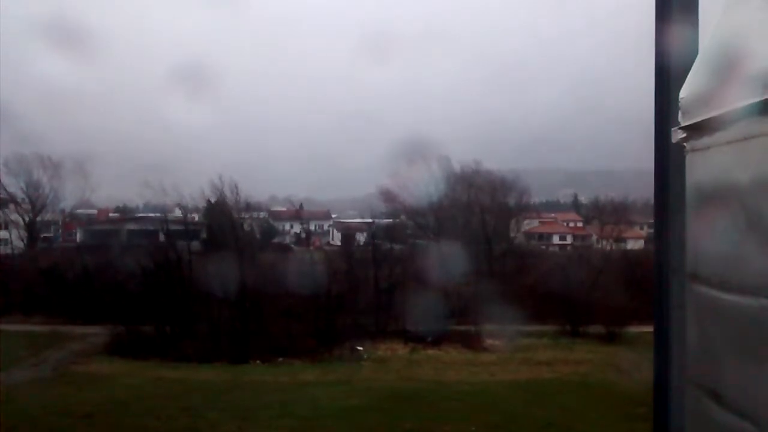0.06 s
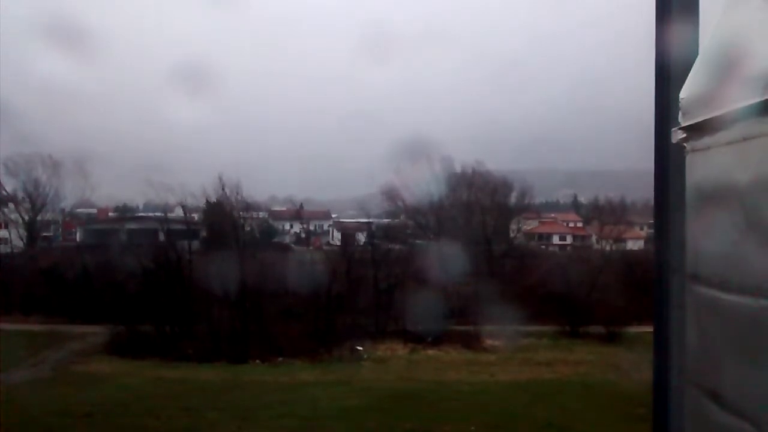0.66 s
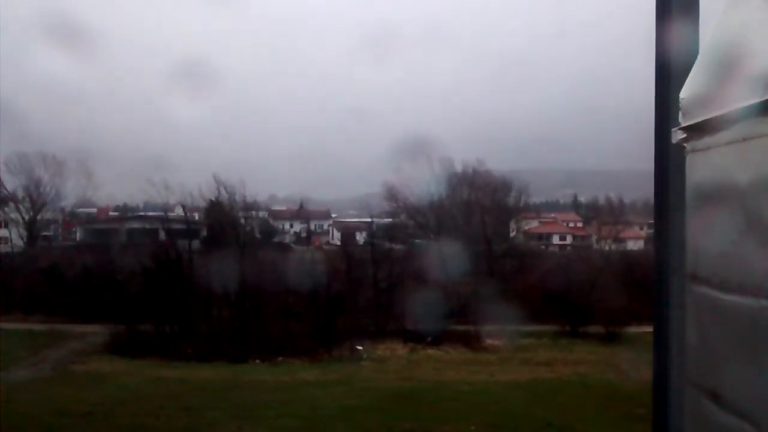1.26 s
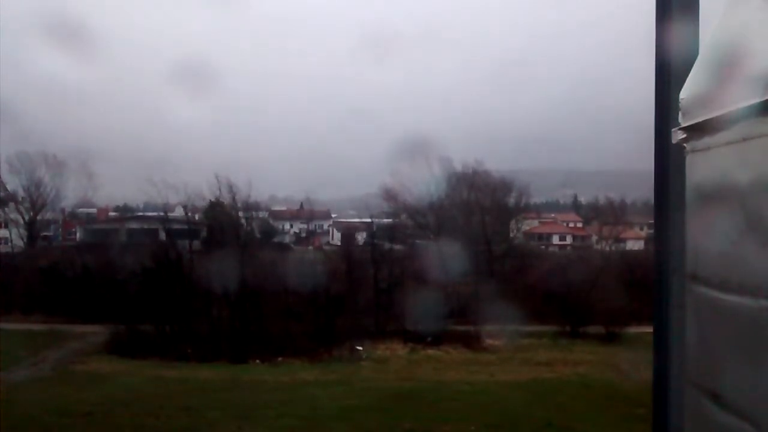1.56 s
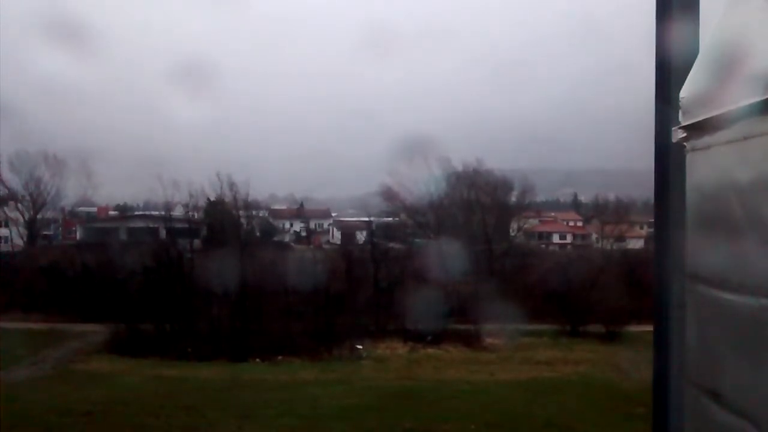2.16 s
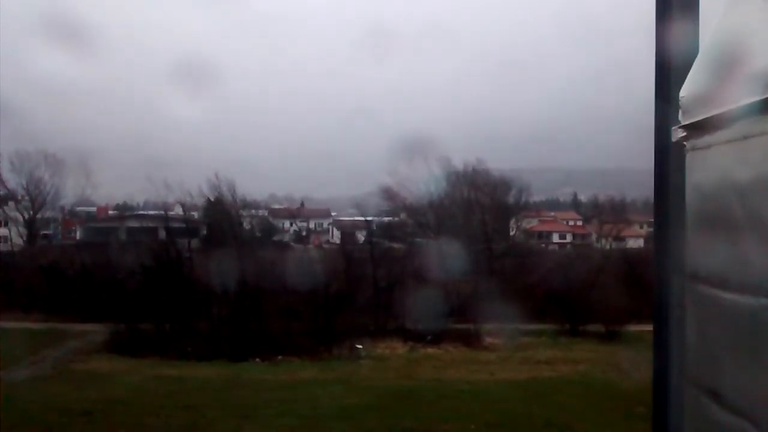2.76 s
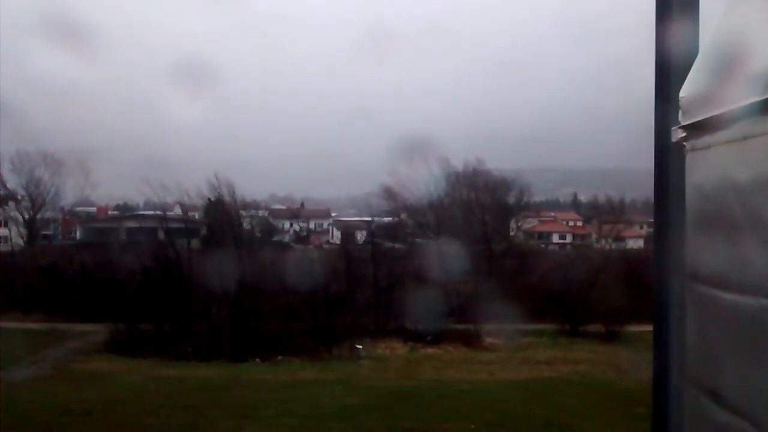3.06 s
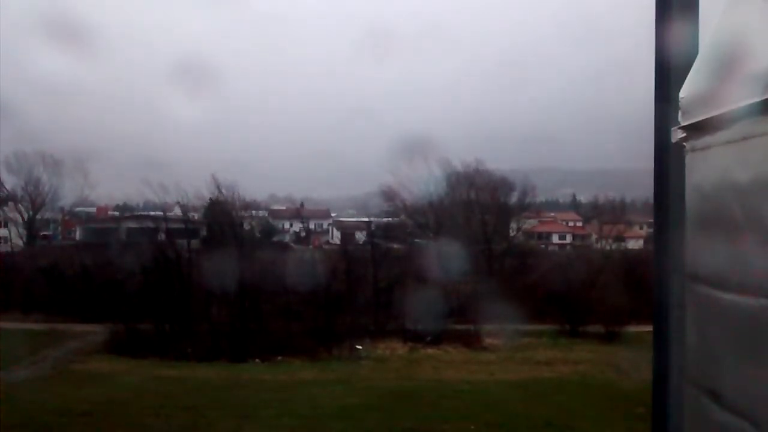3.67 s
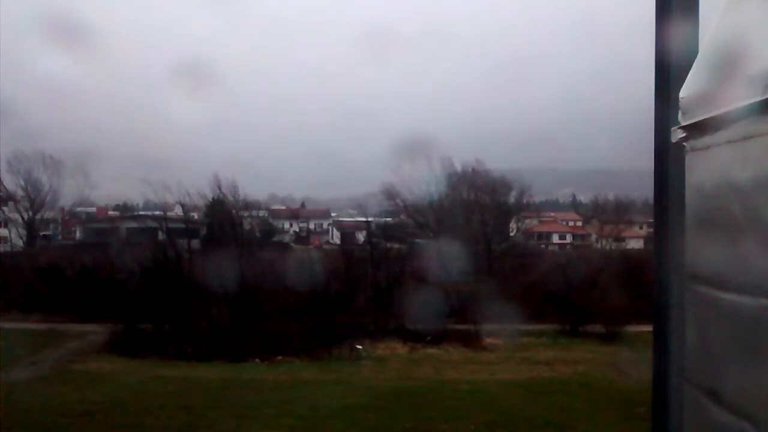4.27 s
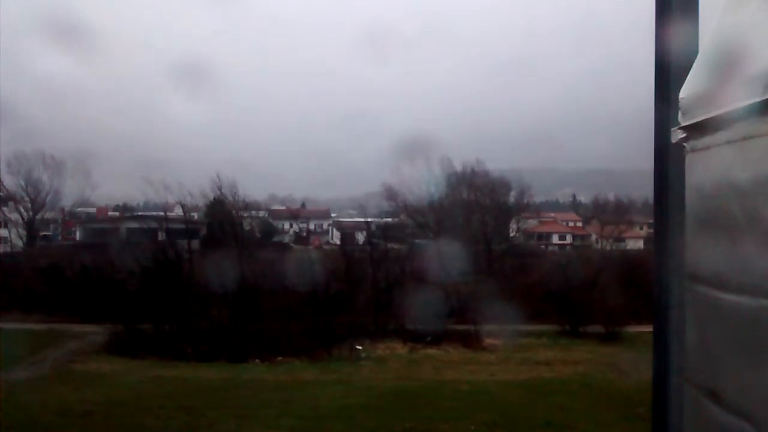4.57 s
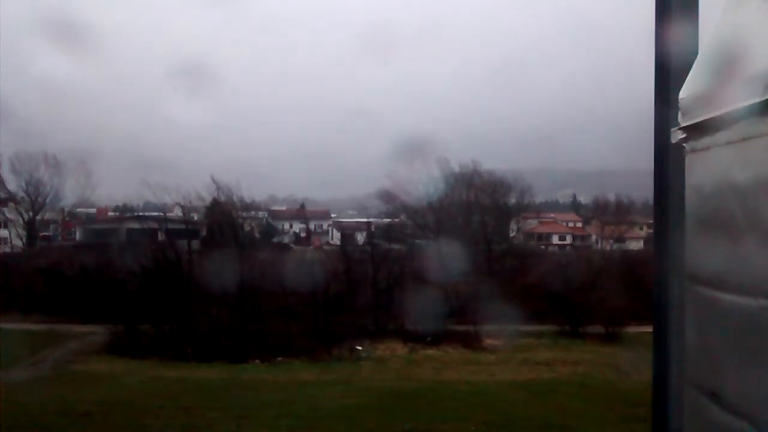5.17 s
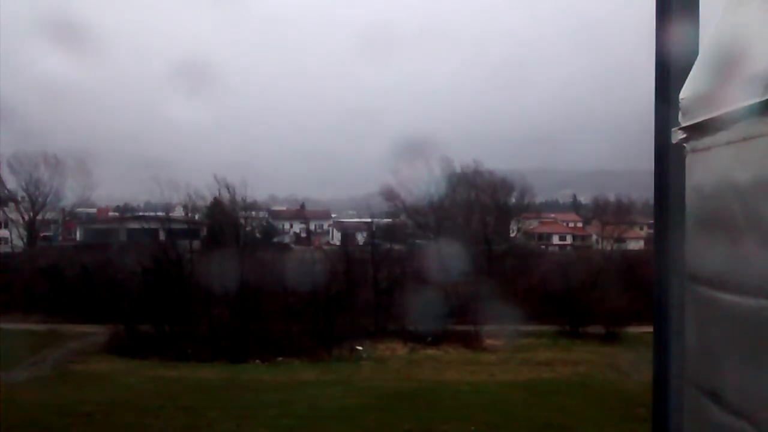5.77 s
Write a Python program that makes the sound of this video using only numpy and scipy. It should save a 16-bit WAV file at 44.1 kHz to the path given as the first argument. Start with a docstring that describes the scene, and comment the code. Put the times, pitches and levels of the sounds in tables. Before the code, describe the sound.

Steady, low storm wind hums and rumbles at a closed window, heard from indoors, with fine rain and a few drops ticking.

```python
"""Storm at a window, from indoors.

Gusts shake the pane, drone in the window recess, hum past the closed window, roar round the walls
and rush through the trees. One squall throws fine rain on the glass; a few heavier drops tick on
the sill. Two spaced microphones pick it up over their own faint hiss."""
import sys
import numpy as np
from scipy import signal
from scipy.fft import rfft, irfft, next_fast_len
from scipy.io import wavfile
from scipy.ndimage import uniform_filter1d, map_coordinates

SR = 44100
rng = np.random.default_rng(int(sys.argv[2]) if len(sys.argv) > 2 else 0)


def inscribe(sig):
    """Save sig as 16-bit PCM at rate SR to the path in sys.argv[1].

    A 1-D sig is mono; a 2-D sig holds one channel per row.
    Samples are clipped to [-1, 1] before scaling.
    """
    pcm = np.round(np.clip(np.atleast_2d(sig).T, -1, 1) * 32767)
    wavfile.write(sys.argv[1], SR, pcm.astype(np.int16))


N = 256662

# wind strength; roar, rush, rumble, drone, base hum and drizzle each follow their own share:
# t/s, level about the mean/dB
WIND_STRENGTH = [(0, 3), (0.2, 5), (0.55, 5), (1.2, 3), (1.55, 2), (1.92, 2), (2.2, -0.9), (2.45, -2.5),
                 (3.0, -6), (3.42, -4.5), (3.6, -3.5), (4.15, -3.5), (4.7, -1.5), (5.03, -2), (5.35, -0.5),
                 (5.82, 1.5)]


def amp(db):
    """Decibels to gain."""
    return 10 ** (np.asarray(db) / 20)


def unit(x):
    """Scale to rms 1."""
    return x / np.sqrt(np.mean(x ** 2) + 1e-20)


def along(points, hz):
    """Interpolate (f/Hz, value) points on a log axis."""
    f, values = np.transpose(points)
    return np.interp(np.log(hz + 1), np.log(f + 1), values)


def curve(points):
    """Interpolate (t/s, value) points per sample."""
    return np.interp(np.arange(N) / SR, *np.transpose(points))


def swell(peak_s, length_s):
    """Bell of height 1, above half for length_s."""
    return np.exp2(-(2 * (np.arange(N) / SR - peak_s) / length_s) ** 2)


def wobble(rate_hz):
    """Smooth random curve, rate_hz knots a second."""
    knots = rng.standard_normal(int(N * rate_hz / SR) + 4)
    return map_coordinates(knots, [np.arange(N) * rate_hz / SR])


def filtered(x, response):
    """Apply a frequency response."""
    size = next_fast_len(N + SR // 2)
    return irfft(rfft(x, size) * response(np.fft.rfftfreq(size, 1 / SR)), size)[..., :N]


def resonance(hz, centre_hz, width_hz):
    """Gain of one mode, 1 at its centre."""
    return hz * width_hz / np.hypot(centre_hz ** 2 - hz ** 2, hz * width_hz)


def steadied(x, span_s):
    """Even out a noise's own swells: divide by its running rms."""
    power = uniform_filter1d(np.mean(x ** 2, axis=0), max(int(span_s * SR), 1))
    return x / np.sqrt(np.abs(power) + 1e-9)


def noise_pair():
    """Two independent white noises."""
    return rng.standard_normal((2, N))


def microphones(pair, gain, coherence=None, balance=None):
    """Spaced pair: two independent signals become coloured, partly coherent stereo of rms 1."""
    # phase lead of left over right: f/Hz, phase/rad
    lead = [(0, 0), (340, 3.8), (690, 5.2), (1380, 6.3), (2410, 9.3), (2670, 9.5), (3530, 12.4),
            (3790, 12.7), (4740, 16.0), (5250, 16.8), (5940, 19.8), (6290, 19.8), (8790, 12.7),
            (15500, -3.5)]
    # likeness of the channels: f/Hz, coherence
    default_coherence = [(20, .5), (43, .68), (70, .15), (130, .45), (250, .45), (450, .62), (560, .55),
                         (750, .76), (1000, .91), (1300, .96), (2000, .8), (2400, .99), (2700, 1),
                         (3100, .85), (3700, 1), (6000, .7)]
    # left minus right: f/Hz, level/dB
    default_balance = [(25, 2.5), (43, 2.5), (70, -1), (110, 4.5), (250, 2.5), (390, 6), (700, 3),
                       (1300, 1.5), (2550, 0), (4400, -.3), (6000, 3), (12000, 1)]
    coherence = coherence or default_coherence
    balance = balance or default_balance
    angle = lambda hz: np.arccos(np.clip(along(coherence, hz), 0, 1)) / 2
    mid, side = filtered(pair, lambda hz: np.array([np.cos(angle(hz)), np.sin(angle(hz))]))
    half = np.array([[1], [-1]]) / 2
    pan = lambda hz: amp(half * along(balance, hz))
    phase = lambda hz: np.exp(1j * half * np.interp(hz, *np.transpose(lead)))
    return unit(filtered(np.array([mid + side, mid - side]), lambda hz: gain(hz) * pan(hz) * phase(hz)))


def through_frame(spectrum):
    """Response of an outdoor spectrum coloured by the window frame."""
    # frame resonances: f/Hz, width/Hz, lift/dB
    modes = [(377.5, 48, 10), (453.4, 67, 8), (573, 43, 6), (689, 91, 6.5), (931.5, 49, 7),
             (1100, 29, -9.5), (1200, 48, 2), (1317, 42, 5), (1788, 260, 8.5), (1947, 30, 6),
             (2778, 105, 12), (3090, 210, 4)]
    lift_db = lambda hz: sum(db * resonance(hz, f, width) ** 2 for f, width, db in modes)
    return lambda hz: amp(along(spectrum, hz) + lift_db(hz))


def blown(level_db, wind_share, flutter_db, flutter_hz):
    """Gain of a layer that follows the wind, with its own turbulence."""
    return amp(level_db + wind_share * curve(WIND_STRENGTH) + flutter_db * wobble(flutter_hz))


def gusts_db():
    """Extra push of single gusts on pane, recess, walls and trees, per sample."""
    # gusts striking the house: peak t/s, length/s, pane/dB, recess/dB, walls/dB, trees/dB
    gusts = [(0.308, 0.13, 1, 5, 0, -1), (0.566, 0.099, -4, 3.5, 0.5, 1), (0.965, 0.63, -0.5, 2.5, -1, 0),
             (2.152, 0.18, 5, 0.5, 3.5, 0), (2.37, 0.17, 0.5, 4.5, 0.5, 0), (2.598, 0.074, 8, 3.5, 2.5, 0),
             (3.594, 0.087, 2, -3, 3, 2.5), (3.96, 0.11, 2.5, 3.5, 2, 2.5),
             (4.302, 0.12, 4, 0.5, 0.5, -0.5), (4.73, 0.11, 1, 0.5, 1, 1), (5.267, 0.21, -2, 3, 0.5, 0.5),
             (5.77, 0.15, 6.5, 4.5, -1, -0.5)]
    return sum(np.outer(db, swell(peak_s, length_s)) for peak_s, length_s, *db in gusts)


def hiss(level_db=-60.5, waver_db=0.5):
    """Faint, nearly even hiss of distant rain and of the microphones themselves."""
    # hiss spectrum: f/Hz, level/dB
    spectrum = [(100, 3), (2000, -12), (2550, 7), (3200, 4.5), (4300, 4), (6000, 1.5), (9000, 1.9),
                (15000, 0)]
    # f/Hz, coherence
    coherence = [(1800, 0.62), (2550, 1.0), (3300, 0.13), (4700, 0.55), (5600, 0.12), (8000, 0.36),
                 (15000, 0.077)]
    noise = microphones(noise_pair(), lambda hz: amp(along(spectrum, hz)), coherence, [(8000, 0.25)])
    return amp(level_db + waver_db * wobble(15)) * noise


def squall(peak_s=1.452, peak_db=-50, attack_s=0.085, hold_s=0.42, sag_db_per_s=5.5, decay_db_per_s=26):
    """Gain of the squall's rain: fast attack, sagging hold, decay."""
    t = np.arange(N) / SR - peak_s
    fall_db = sag_db_per_s * np.clip(t, 0, hold_s) + decay_db_per_s * np.maximum(t - hold_s, 0)
    return amp(peak_db - fall_db) * np.exp(np.minimum(t, 0) / attack_s)


def spray(hits_per_s=1800, scatter_db=-0.5, flurry_db=1.0):
    """Droplets of uneven size patter on the glass: faint with the wind, louder in the squall."""
    # patter spectrum: f/Hz, level/dB
    spectrum = [(500, -19), (1200, -3.5), (1800, -9.5), (2300, 0.5), (2700, -5.5), (3400, -5),
                (4150, -11.5), (4900, -18), (6200, -16.5), (8000, -23.5), (15000, -27)]
    hits = rng.random((2, N)) < hits_per_s / SR
    sizes = rng.choice([-1, 1], (2, N)) * amp(scatter_db * noise_pair())
    patter = steadied(microphones(hits * sizes, through_frame(spectrum)), span_s=0.08)
    drizzle = blown(level_db=-67, wind_share=0.74, flutter_db=2.7, flutter_hz=14)
    return np.hypot(drizzle, squall()) * amp(flurry_db * wobble(50)) * patter


def sill_drops(splash_s=0.015, crack_db=13.5, crack_db_per_oct=11, t60_s=0.1, rise_s=0.0022, gain_db=-6):
    """Each drop cracks on the sill and splashes; the spot rings until the spreading water damps it."""
    # heavy drops: t/s, relative level/dB, tilt/(dB/oct), ring f/Hz, ring over splash/dB
    drops = [(0.92, -49.5, -5, 3540, 4), (1.75, -51, -6, 3420, 2), (2.812, -59, -3, 3370, 5),
             (3.231, -52, -25, 1340, 7), (3.884, -53, -10, 3300, -1), (3.937, -56, -9, 1800, -2),
             (3.982, -51.5, -9, 3270, 6), (4.667, -50.5, -13, 1990, 6.5), (4.822, -44, 1, 3600, 4.5),
             (5.248, -58, -2, 3620, 2)]
    # sill resonances, colouring crack and splash: f/Hz, width/Hz, level/dB
    sill_modes = [(1410, 1100, -3), (2230, 730, -2), (2720, 1100, 5), (3570, 390, 0), (4650, 480, -17),
                  (4980, 450, -3.5), (6050, 590, -9.5), (7100, 1600, -28)]
    # mode pair of the struck spot: ratio to ring f, level/dB
    ring_modes = [(1, -3), (0.8, 1.5)]
    track = np.zeros((2, N))
    t = np.arange(2048) / SR
    hz = np.fft.rfftfreq(len(t), 1 / SR)
    sill = sum(amp(db) * resonance(hz, f, width) ** 2 for f, width, db in sill_modes)
    octaves = lambda f: np.log2(np.clip(f, 1000, 7000) / 1000)
    impulse = lambda f, width: width ** 2 * t * np.exp(-np.pi * width * t) * np.sin(2 * np.pi * f * t)
    spread = np.exp(-(t / splash_s) ** 4)
    ring_envelope = spread * amp(-60 * t / t60_s) * (1 - np.exp(-t / rise_s))
    for start_s, level_db, tilt, ring_hz, ring_db in drops:
        crack = sum(amp(db + (tilt + crack_db_per_oct) * octaves(f)) * impulse(f, width)
                    for f, width, db in sill_modes)
        noise = irfft(rfft(rng.standard_normal(len(t))) * sill * amp(tilt * octaves(hz)))
        splash = unit(noise * spread) * np.sqrt(np.mean(spread ** 2))
        ring = sum(amp(db) * np.sin(2 * np.pi * ratio * ring_hz * t) for ratio, db in ring_modes)
        drop = amp(crack_db) * crack / np.abs(crack).max() + splash + amp(ring_db) * ring_envelope * ring
        track[0, round(start_s * SR):][:len(t)] += amp(level_db + gain_db) * drop
    rms = np.sqrt(np.mean(track[0] ** 2))
    return rms * microphones(track, np.ones_like, coherence=[(3000, 1)])


def pane_thrum(centre_hz=40, width_hz=17, skirt_db=-19):
    """The whole pane flexes in its deepest mode as the pressure on it comes and goes."""
    # pressure swings on the pane: t/s, level/dB
    pressure = [(0, -43.5), (0.27, -43), (0.6, -46), (1.03, -39.5), (1.15, -44.5), (1.66, -49),
                (1.8, -44.5), (2.3, -44), (2.95, -48.5), (3.2, -45), (3.38, -56), (3.85, -48), (4.3, -50),
                (4.5, -49.5), (5.02, -49.5), (5.2, -45.5), (5.5, -48), (5.72, -39), (5.82, -43)]
    gain = lambda hz: resonance(hz, centre_hz, width_hz) ** 2 + amp(skirt_db) * resonance(hz, 26, 45) ** 2
    return amp(curve(pressure)) * steadied(microphones(noise_pair(), gain), span_s=0.11)


def window_hum(centre_hz=149, width_hz=20, swell_width_hz=15, left_db=12.5, base_db=-49, wind_share=0.49):
    """Air forced past the closed window hums in a narrow resonance; each swell has its own pitch."""
    # hum swells: peak t/s, length/s, level/dB, f/Hz
    swells = [(0.163, 0.16, -42, 148), (0.422, 0.26, -43.5, 151), (0.9, 0.66, -51.5, 161),
              (2.186, 0.093, -43, 157), (3.31, 0.22, -44, 149.4), (3.508, 0.19, -43, 148),
              (3.858, 0.27, -43.5, 148.4), (4.436, 0.12, -43.5, 147.5), (4.93, 0.21, -44, 152.4),
              (5.196, 0.15, -42.5, 155), (5.45, 0.35, -44.5, 149), (5.705, 0.13, -40.5, 150.6)]

    def band(pitch_hz, band_hz):
        """Narrow noise band of even strength."""
        gain = lambda hz: resonance(hz, pitch_hz, band_hz) ** 2
        return steadied(microphones(noise_pair(), gain, balance=[(centre_hz, left_db)]), span_s=0.034)

    base = amp(base_db + wind_share * curve(WIND_STRENGTH))
    envelopes = [amp(db) * swell(peak_s, length_s) for peak_s, length_s, db, _ in swells]
    hum = base * band(centre_hz, width_hz)
    hum += sum(envelope * band(f, swell_width_hz) for envelope, (*_, f) in zip(envelopes, swells))
    return np.hypot(base, sum(envelopes)) * steadied(hum, span_s=0.11)


def eddies(depth_db):
    """Noise pair whose strength drifts in patches of time and frequency."""
    spectra = signal.stft(noise_pair(), nperseg=512)[2]
    patches = uniform_filter1d(rng.standard_normal(spectra.shape[1:]), size=6, axis=0)
    patches = uniform_filter1d(patches, size=14, axis=1)
    return signal.istft(spectra * amp(depth_db * unit(patches)), nperseg=512)[1][:, :N]


def outdoor_wind():
    """Eddies make a dull roar round the walls and a brighter rush in the trees."""
    # wind round the walls: f/Hz, level/dB
    roar_spectrum = [(60, -21), (130, -11), (230, -1.5), (310, 3.5), (400, -4), (500, -3), (620, -9.5),
                     (800, -11), (1200, -33), (3000, -55)]
    # wind in the trees: f/Hz, level/dB
    rush_spectrum = [(300, -19), (600, -11.5), (850, -1), (1100, 0.5), (1500, -4), (1900, -11.5),
                     (2300, -3.5), (2650, -15), (3500, -13), (4300, -21), (8000, -27.5), (16000, -27)]
    roar = microphones(eddies(depth_db=1.35), through_frame(roar_spectrum))
    rush = microphones(eddies(depth_db=1.05), through_frame(rush_spectrum))
    roar *= blown(level_db=-46.0, wind_share=0.68, flutter_db=0.5, flutter_hz=7.8)
    rush *= blown(level_db=-54.5, wind_share=0.86, flutter_db=0.4, flutter_hz=11)
    _, _, walls_db, trees_db = gusts_db()
    return roar * amp(walls_db) + rush * amp(trees_db)


def buffeting(low_hz=150, high_hz=330):
    """Gusts push on the pane, which rumbles and sets the air of the recess droning."""
    # broad rumble of the pane: f/Hz, level/dB
    rumble_spectrum = [(5, -29), (25, -17.5), (60, -13), (85, -11), (115, -6), (200, -28), (500, -62)]
    # pane resonances: f/Hz, width/Hz, level/dB
    pane_modes = [(73, 36, -8.5), (104, 13, -8)]
    # standing waves in the recess: f/Hz, width/Hz, left/dB, right/dB
    recess_modes = [(164, 12, -6, -15.5), (182.5, 6.7, -3.5, 2), (195.7, 7.9, -2, -9.5),
                    (226, 16.3, -7, -8.5), (260.7, 11.5, -5.5, -9.5)]

    def pane(hz):
        """Broad rumble and pane modes, summed in power."""
        power = sum((amp(db) * resonance(hz, f, width) ** 2) ** 2 for f, width, db in pane_modes)
        return np.sqrt(amp(along(rumble_spectrum, hz)) ** 2 + power)

    def recess(hz):
        """Standing waves per channel, summed in power and band-passed."""
        power = sum((amp([[left_db], [right_db]]) * resonance(hz, f, width)) ** 2
                    for f, width, left_db, right_db in recess_modes)
        return np.sqrt(power / (1 + (hz / high_hz) ** 8) / (1 + (low_hz / (hz + 1)) ** 8))

    rumble = steadied(microphones(noise_pair(), pane), span_s=0.12)
    drone = steadied(microphones(noise_pair(), recess, balance=[(150, 0)]), span_s=0.074)
    rumble *= blown(level_db=-50.0, wind_share=0.49, flutter_db=1.0, flutter_hz=15)
    drone *= blown(level_db=-44.5, wind_share=0.17, flutter_db=0.66, flutter_hz=6.5)
    pane_db, recess_db, _, _ = gusts_db()
    return rumble * amp(pane_db) + drone * amp(recess_db)


def scene():
    """Wind and rain on the window."""
    return pane_thrum() + buffeting() + window_hum() + outdoor_wind() + spray() + sill_drops() + hiss()


def record(dry):
    """Brick-wall low-pass."""
    top_hz = 15550
    return filtered(dry, lambda hz: hz < top_hz)


dry = scene()
out = record(dry)
inscribe(out)
```